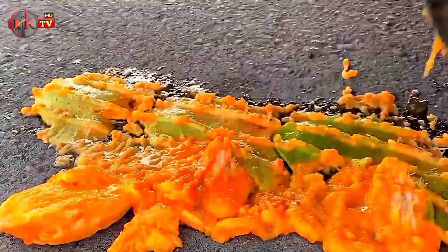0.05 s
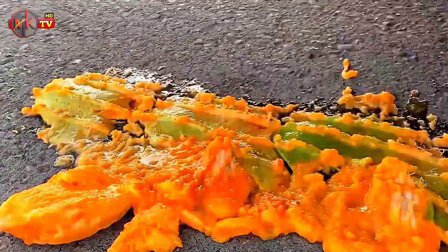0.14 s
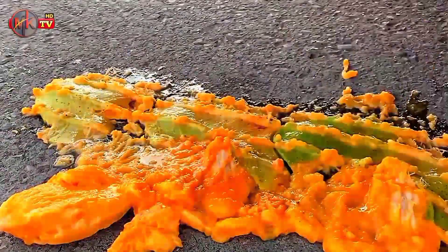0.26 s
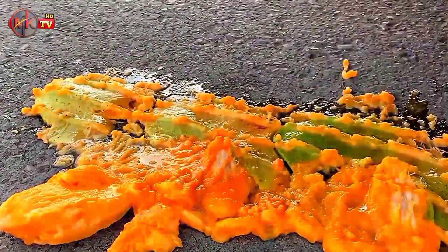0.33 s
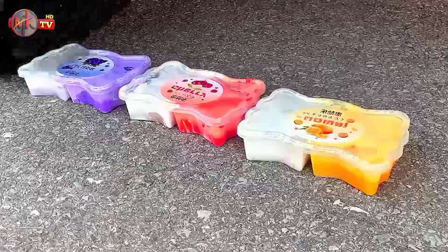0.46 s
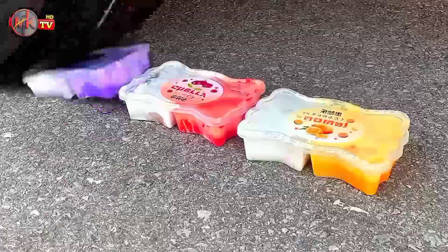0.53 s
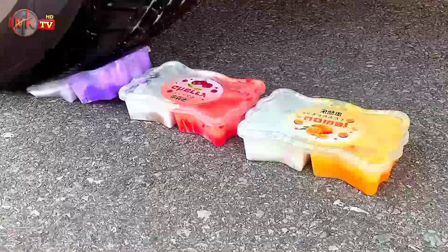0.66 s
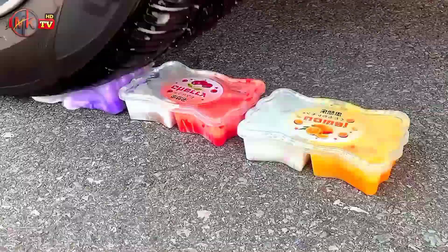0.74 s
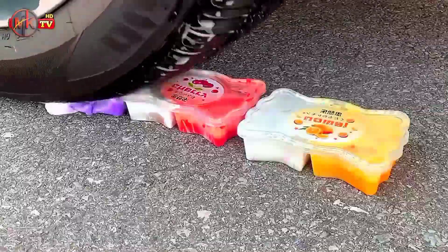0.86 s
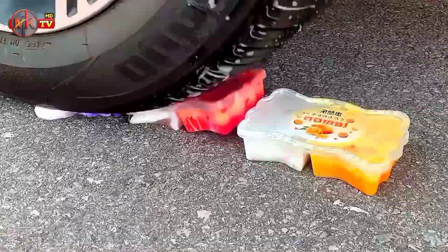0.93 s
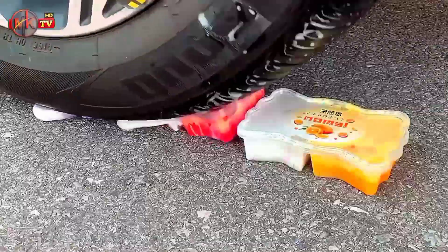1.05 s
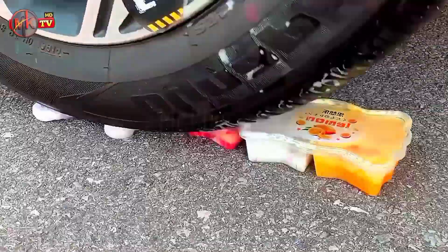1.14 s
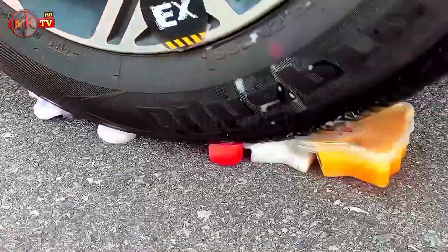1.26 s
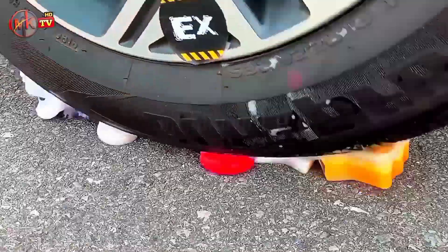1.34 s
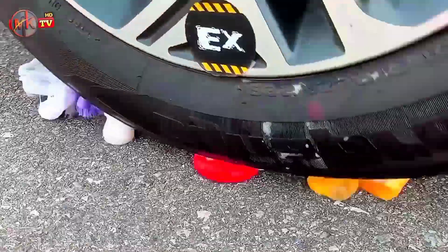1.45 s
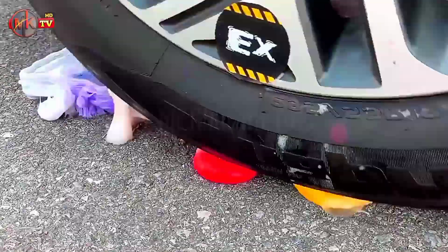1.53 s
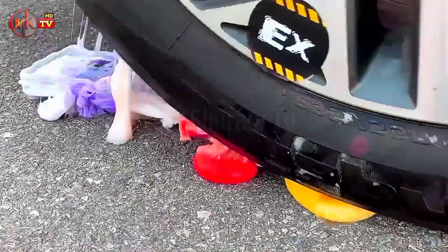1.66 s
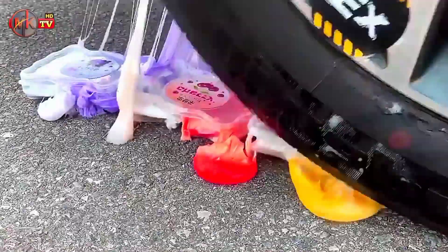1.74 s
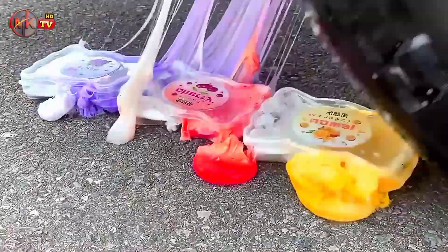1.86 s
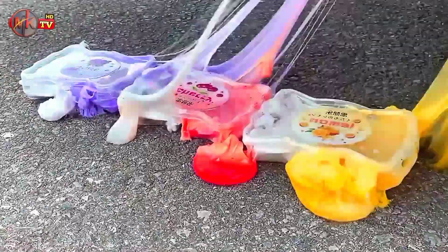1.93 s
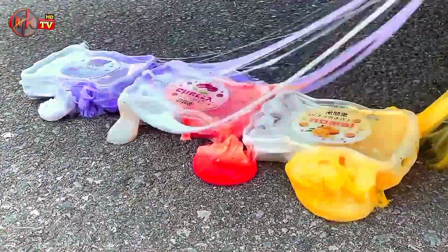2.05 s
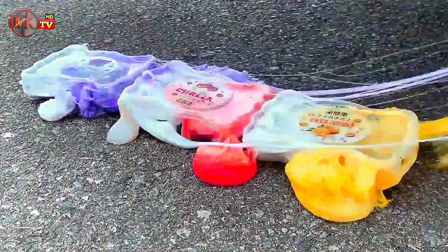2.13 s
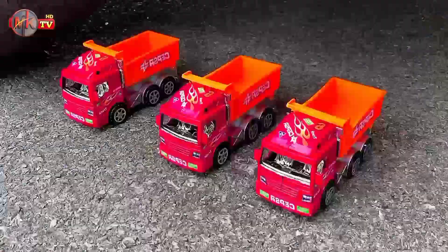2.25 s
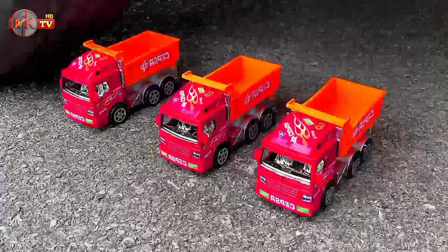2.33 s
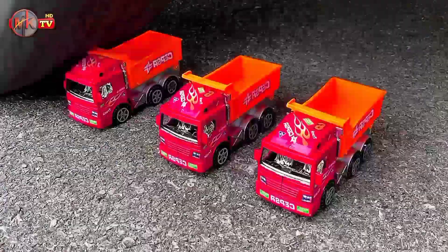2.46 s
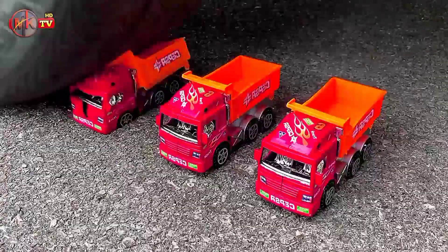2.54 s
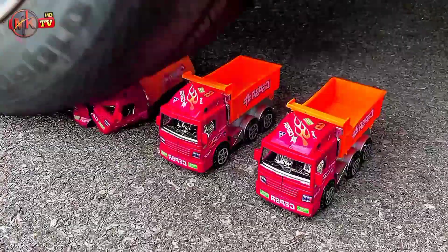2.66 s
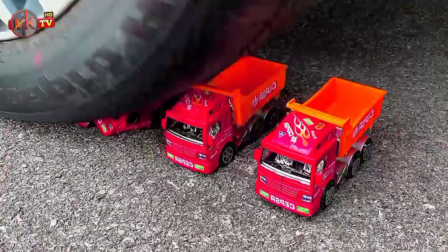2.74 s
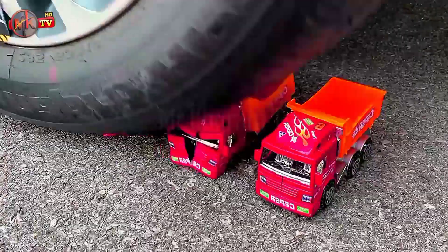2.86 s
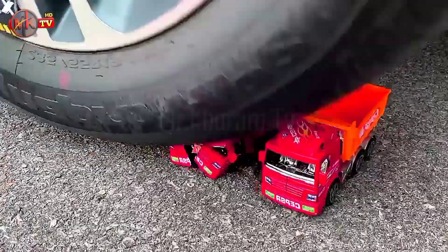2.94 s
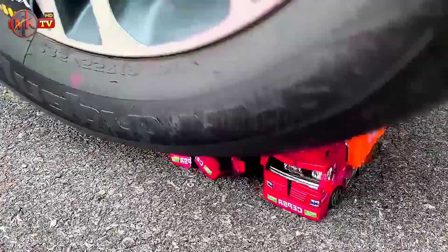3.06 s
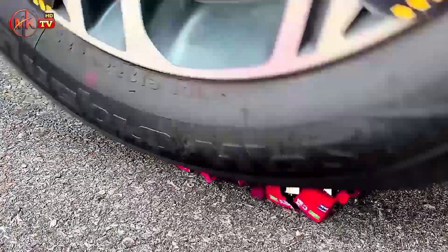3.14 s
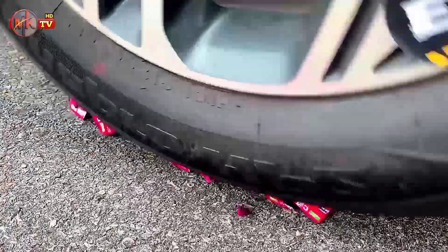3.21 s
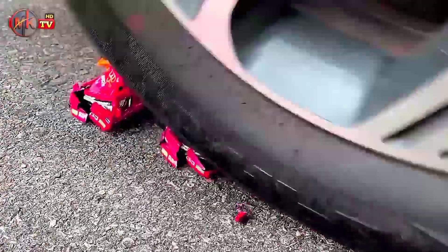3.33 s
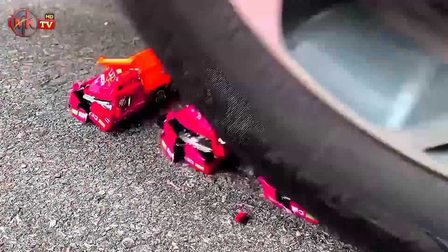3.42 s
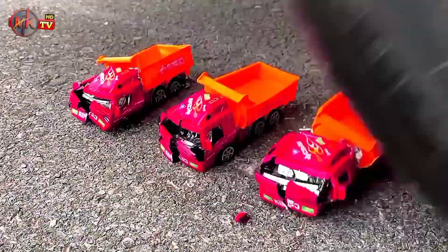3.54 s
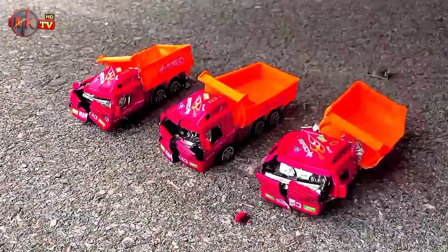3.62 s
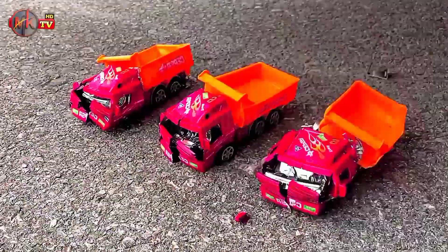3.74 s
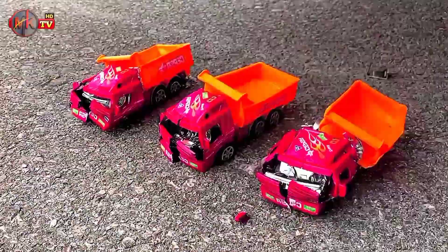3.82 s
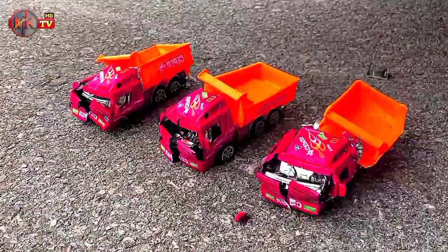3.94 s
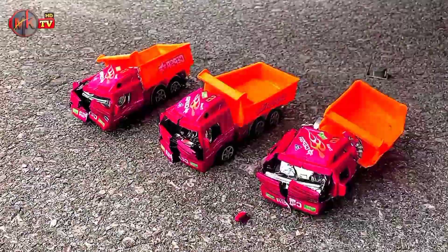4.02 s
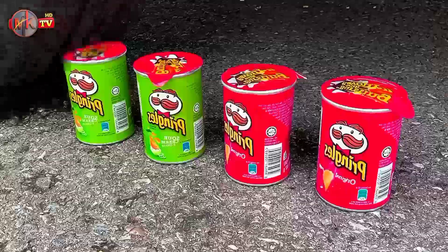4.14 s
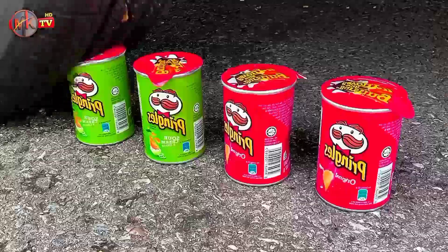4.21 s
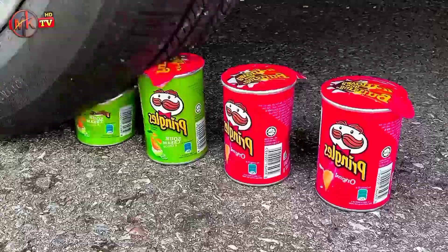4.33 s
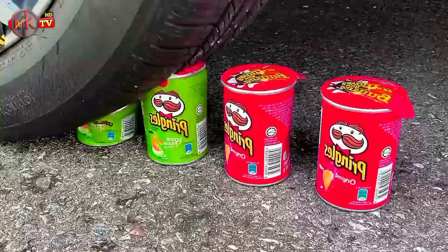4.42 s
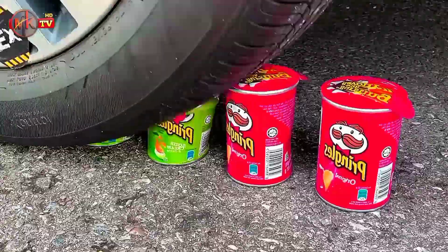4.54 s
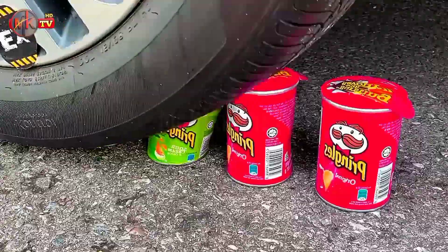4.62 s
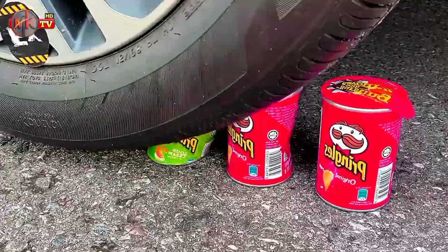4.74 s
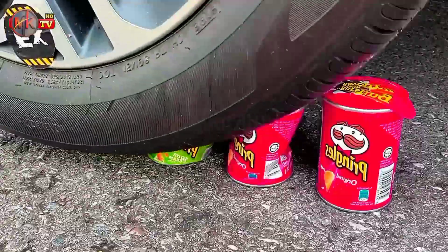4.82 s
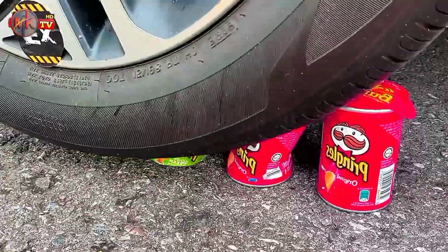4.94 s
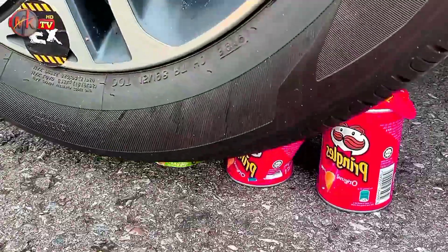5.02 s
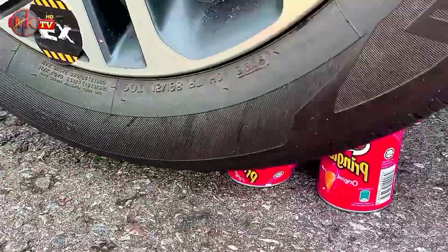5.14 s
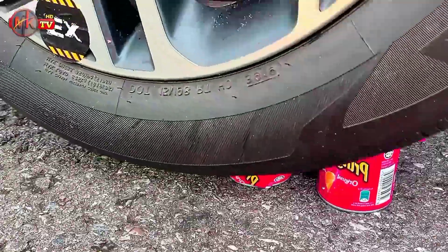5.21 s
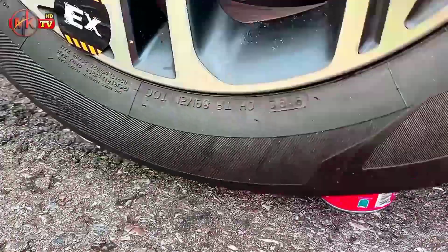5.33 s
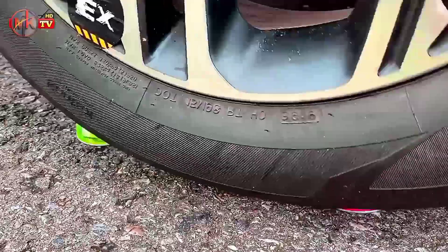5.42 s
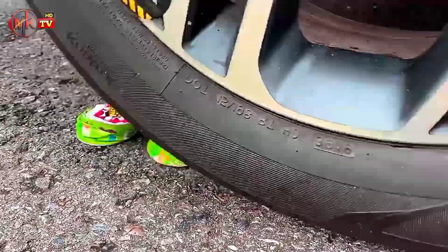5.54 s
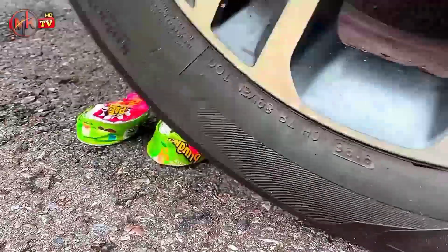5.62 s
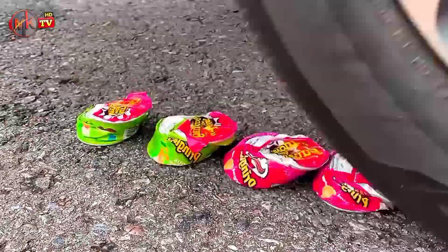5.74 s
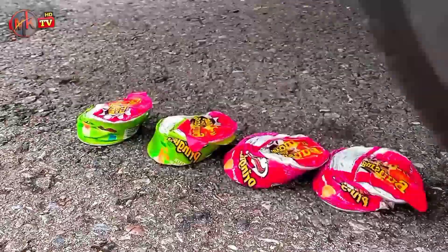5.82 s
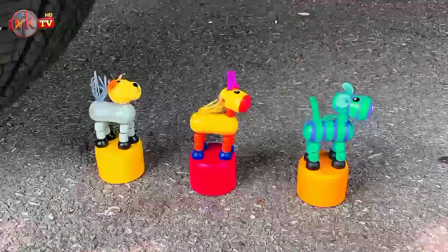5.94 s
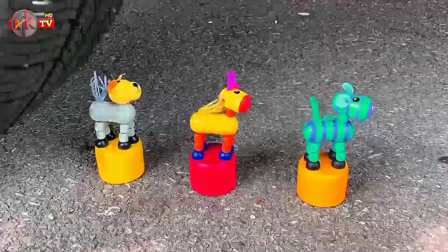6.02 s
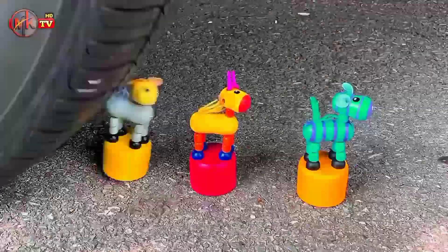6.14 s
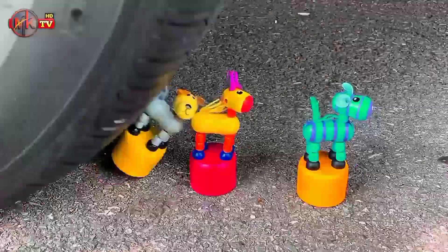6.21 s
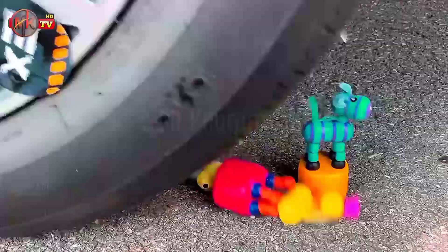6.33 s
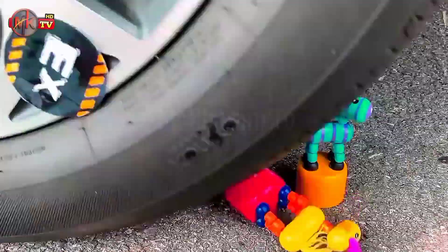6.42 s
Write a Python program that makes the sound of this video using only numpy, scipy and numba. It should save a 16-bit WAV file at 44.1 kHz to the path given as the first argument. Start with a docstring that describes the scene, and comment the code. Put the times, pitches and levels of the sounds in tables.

```python
"""On asphalt, right beside the wheel: a car tyre creeps over things laid on the ground.
Thin slime tubs pop, hard toy trucks snap, and cans of crisps buckle and grind to crumbs; at the end
the tyre nudges a row of toy figures. Fractures are click clusters that ring a shell, crumbling is dense
grains of noise, small pops are decaying sines. Sagging sine thuds mark things giving way, and coloured
noise makes the low rumble and faint hiss of the car."""
import sys
import numpy as np
from scipy import signal
from scipy.fft import rfft, irfft
from scipy.io import wavfile
from numba import njit

SR = 44100
rng = np.random.default_rng(int(sys.argv[2]) if len(sys.argv) > 2 else 0)


def output_pcm(signal):
    """Save a mono or channel-first signal as 16-bit PCM at the path in sys.argv[1].

    Samples are clipped to [-1, 1] before scaling.
    """
    pcm = np.clip(np.atleast_2d(signal).T, -1, 1) * 32767
    wavfile.write(sys.argv[1], SR, np.round(pcm).astype(np.int16))


N = 285327
TIME, FREQ = np.arange(N) / SR, np.fft.rfftfreq(N, 1 / SR)

# Crack and squeeze levels are starting points: each source's trims, the ports and record() act on them later.
# Tubs bursting: hollow body, sharp snap, shell resonance [start_s, body_db, snap_db, pitch_hz, decay_s]
TUB_CRACKS = [(0.6975, -18.5, -28.5, 560, 0.00072), (0.7262, -35, -29.5, 1650.0, 0.00045),
              (0.7825, -45, -31.5, 900, 0.0005), (0.8631, -16, -20, 1736, 0.023),
              (0.9045, -19.5, -20.5, 1910, 0.01), (0.9574, -13, -17, 801, 0.0023),
              (0.961, -14.5, -23, 1830, 0.0068), (1.0472, -24, -26.5, 1153, 0.0058),
              (1.0579, -18, -23, 563, 0.0013), (1.1358, -24, -25, 2790, 0.0088),
              (1.157, -37, -44, 2750, 0.045), (1.2045, -17, -29, 940, 0.00059),
              (1.2127, -30.5, -18, 591, 0.028), (1.2401, -20, -17.5, 1390, 0.0061),
              (1.298, -18.5, -24.5, 1026, 0.0026), (1.3254, -15.5, -20.5, 898, 0.0038),
              (1.3733, -10, -28, 594, 0.0057), (1.4239, -19.5, -26.5, 1100, 0.0043),
              (1.513, -9, -31, 1540, 0.00096), (1.5305, -14, -24, 935, 0.00074),
              (1.5638, -29, -9, 1082, 0.011), (1.572, -10, -16.5, 1174, 0.0073),
              (1.597, -10, -13, 980, 0.016), (1.606, -10.5, -21, 852, 0.015),
              (1.672, -20, -24.5, 1306, 0.0033), (1.6874, -20.5, -35.5, 1220, 0.00097),
              (1.7078, -21.5, -21.5, 1500, 0.0021), (1.7301, -18, -30.5, 465, 0.0073),
              (1.9231, -16, -33, 873, 0.00097), (1.9357, -23.5, -30.5, 1870, 0.0018),
              (1.9529, -23.5, -35, 1090, 0.012), (1.9934, -30, -46, 871, 0.0021),
              (2.009, -32.5, -45.5, 710, 0.0036)]
# The tyre bears down on three tubs [start_s, end_s, body_db, treble_db]
TUB_SQUEEZES = [(.87, 1.18, -49.5, -45), (1.21, 1.55, -37.5, -40.5), (1.6, 2.005, -31, -48)]
# Colour of the thin tubs, relative power density [freq_hz, density_db]
TUB_COLOUR = [(120, 1.5), (300, 4), (900, 0), (1500, -4), (2300, -8.5), (4300, -12), (6200, -8.5),
              (8400, -15.5), (10800, -21.5)]


def tubs():
    """Thin shells burst in clicks and shed splinters, while air pockets burst in the slime."""
    bursts = cracks(TUB_CRACKS, TUB_COLOUR, ring_q=2.0, ring_db=11.0, tail_db=-31.5, tail_s=0.0083)
    pressing = squeeze(TUB_SQUEEZES, attack_s=0.013, release_s=.01,
                       body_sag_db_per_s=29.5, treble_sag_db_per_s=30.5)
    shedding = debris(TUB_CRACKS, settle_s=0.021, body_db=-17.5, snap_db=-14.0)
    effort = np.hypot(pressing, shedding)
    splinters = crumble(effort, TUB_COLOUR, rate=2200, surge_db=6, body_db=0, snap_db=-1)
    air_pockets = pops(effort, count=4000, low_hz=380, high_hz=1400, cycles=3.4, db=-5.5)
    return bursts + splinters + air_pockets + squelch()


# Slime squelches out from under the tyre [start_s, end_s, body_db, treble_db]
SQUELCHES = [(1.66, 2.005, -36, -37)]
# Colour of the slime, relative power density [freq_hz, density_db]
SLIME_COLOUR = [(150, -0.5), (1000, 5), (2000, -9.5), (6500, -8.5), (8400, -26)]


def squelch():
    """Wet slime is forced out as a dense run of tiny soft grains that ease off."""
    effort = squeeze(SQUELCHES, attack_s=0.015, release_s=0.0051,
                     body_sag_db_per_s=15, treble_sag_db_per_s=22)
    return crumble(effort, SLIME_COLOUR, rate=4400, surge_db=1.5, body_db=-2.5, snap_db=-7.5)


# Toys snapping, and at the end two faint knocks of nudged toy figures: hollow body, sharp snap,
# shell resonance [start_s, body_db, snap_db, pitch_hz]
TOY_CRACKS = [(2.6975, -25.5, -16.5, 2600), (2.7183, -19.5, -23.5, 1920), (2.7372, -22, -17, 1280),
              (2.7635, -16, -23, 2120), (2.779, -18.5, -24, 1090), (2.795, -12.5, -17.5, 780),
              (2.8248, -26, -22, 1320), (2.834, -26.5, -31, 2430), (2.8775, -25, -31.5, 2460),
              (2.9385, -22.5, -21, 2130), (2.9578, -24, -22.5, 2530), (2.999, -27.5, -27, 1210),
              (3.0085, -19, -21.5, 1210), (3.045, -21.5, -22, 2400), (3.0765, -21, -16.5, 1900),
              (3.1226, -24.5, -26.5, 1280), (3.157, -24.5, -22.5, 2300), (3.1685, -27, -21, 2400),
              (3.18, -24, -21, 1160), (3.2205, -18.5, -23.5, 313), (3.262, -22, -19.5, 294),
              (3.3265, -18.5, -22, 295), (3.3455, -14.5, -16.5, 900), (3.3586, -27.5, -21, 2430),
              (3.4035, -33, -29, 2450), (3.4158, -15.5, -14, 3100), (3.4355, -21, -15.5, 2820),
              (3.4921, -24.5, -18.5, 350), (3.525, -56.5, -37, 2400), (3.633, -36, -30, 1370),
              (3.662, -36.5, -47, 1400), (6.3472, -37, -55, 1230), (6.4166, -42.5, -51, 1880)]
# The tyre bears down on three trucks, then the wrecks ease back [start_s, end_s, body_db, treble_db]
TOY_SQUEEZES = [(2.715, 2.88, -39, -36), (3.03, 3.10, -32.5, -35), (3.245, 3.28, -29.5, -33),
                (3.5, 3.67, -48, -58)]
# Colour of the hard toys, relative power density [freq_hz, density_db]
TOY_COLOUR = [(120, 5), (300, 2), (1400, 1), (2200, -3.5), (5200, -3), (6500, -3.5), (8400, -11),
              (10800, -16)]


def toys():
    """Hard plastic snaps with a ringing shell, shards grind and pop; nudged figures knock faintly at the end."""
    snaps = cracks(TOY_CRACKS, TOY_COLOUR, ring_q=6.2, ring_db=11.5,
                   tail_db=-14.5, tail_s=0.0048, decay_s=0.0046)
    pressing = squeeze(TOY_SQUEEZES, attack_s=0.016, release_s=0.023,
                       body_sag_db_per_s=13, treble_sag_db_per_s=7)
    shedding = debris(TOY_CRACKS, settle_s=0.021, body_db=-10.5, snap_db=-19.5)
    effort = np.hypot(pressing, shedding)
    shards = crumble(effort, TOY_COLOUR, rate=1200, surge_db=2.5, body_db=-4, snap_db=2)
    plastic = pops(effort, count=1300, low_hz=845, high_hz=4540, cycles=11, db=-6.0)
    return snaps + shards + plastic


# Cans buckling and springing back: hollow body, sharp snap, shell resonance
# [start_s, body_db, snap_db, pitch_hz]
CAN_CRACKS = [(4.205, -39.5, -73, 870), (4.2318, -41, -68.5, 920), (4.3181, -29, -53, 2260),
              (4.3501, -22, -46.5, 2230), (4.3642, -22.5, -41, 2530), (4.444, -28, -44, 1830),
              (4.473, -35, -27.5, 940), (4.5427, -19.5, -29, 1270), (4.5622, -23, -35, 1360),
              (4.612, -26, -56, 864), (4.653, -24, -46, 1340), (4.7273, -23, -25.5, 490),
              (4.795, -50, -53, 950), (4.941, -34.5, -53, 870), (4.9665, -20.5, -41, 950),
              (5.327, -34.5, -57, 950), (5.4281, -24, -43, 1289), (5.518, -32, -34, 1610),
              (5.7701, -25.5, -26, 2670), (5.888, -41, -62.5, 1670)]
# Surges as the tyre dents and flattens four cans [start_s, end_s, body_db, treble_db]
CAN_SQUEEZES = [(4.455, 4.57, -28, -36), (4.655, 4.74, -33.5, -38), (4.95, 5.02, -33.5, -37),
                (5.11, 5.25, -35, -38.5), (5.3, 5.52, -30.5, -35.5)]
# Colour of the cans and crisps, relative power density [freq_hz, density_db]
CAN_COLOUR = [(120, 0), (320, -4.5), (1050, -4.5), (2200, -4.5), (2950, -1.5), (5300, 5.5), (6100, 3.5),
              (6800, 5), (8400, -7.5), (10400, -3), (11500, -50.5)]


def cans():
    """Can walls buckle and crease, crisps grind to crumbs inside them, and the metal ends ring."""
    buckles = undb(-2.0) * cracks(CAN_CRACKS, CAN_COLOUR, ring_q=13.3, ring_db=9.0,
                                  tail_db=5.5, tail_s=0.0087, decay_s=0.0042)
    effort = squeeze(CAN_SQUEEZES, attack_s=0.033, release_s=0.23, body_sag_db_per_s=26)
    effort = effort * held(0, RIDES[-1][1], 1, 0.0082)  # the tyre drops off the last can
    crunch = crumble(effort, CAN_COLOUR, rate=3800, surge_db=1, body_db=-2.0, snap_db=-0.5)
    crisps = walls(crunch, q=6.8, drift=0.041, swell_db=9.5, db=-13.0)
    creases = pops(effort, count=600, low_hz=298, high_hz=2400, cycles=3.2, db=-5)
    # single crisps snapping follow the treble effort
    flakes = pops(effort[::-1], count=1200, low_hz=1450, high_hz=7820, cycles=48, db=-6.5)
    return buckles + crisps + creases + flakes + rims(q=6.7, hz=2906, fade_s=0.028)


# Resonances of the can walls [pitch_hz]
WALL_MODES_HZ = (350, 920, 1340, 1700, 4100)


def walls(crunch, q, drift, swell_db, db):
    """The can walls ring with the crunch; each resonance shifts in pitch and comes and goes as they fold."""
    out = crunch
    for hz in WALL_MODES_HZ:
        centre = hz * np.exp(drift * walk(9))
        gain = undb(db + swell_db * walk(16))
        out = out + gain * np.array([resonate(side, centre, float(q)) for side in crunch])
    return out


# The metal can ends ring brightly as they fold [start_s, end_s, level_db]
RIM_RINGS = [(4.69, 4.74, -28.5), (4.825, 4.835, -35.5), (5.117, 5.287, -40)]


def rims(q, hz, fade_s):
    """Short rasps excite the metal can ends, whose pitch wavers as they bend."""
    effort = sum(undb(db) * held(start, end, fade_s, fade_s) for start, end, db in RIM_RINGS)
    rasp = rng.standard_normal((2, N)) * undb(5 * walk(130))
    centre = hz * np.exp(.035 * walk(45))
    once = [resonate(side, centre, float(q)) for side in rasp]
    ring = np.array([resonate(side, centre, float(q)) for side in once])
    return ring / np.std(ring) * effort


# Dull knocks as something gives way under the tyre; level and pitch before they fade and sag
# [start_s, level_db, pitch_hz]
THUDS = [(0.906, -12.5, 135), (0.963, -14, 143), (1.578, -5, 101), (1.605, -5, 175), (2.791, -18, 293),
         (3.253, -0.5, 105), (3.327, -12.5, 176), (3.435, -3, 325), (4.317, -18.5, 340), (5.372, -19, 315),
         (5.768, -16, 255.2), (5.963, -23.5, 274)]
THUD_CYCLES = 0.88  # swings in which a knock fades to 1 / e


def thuds(sag=0.13, wobble_db=-17, wobble_s=0.042):
    """The rubber lands and swings briefly, its pitch sagging as the load settles; a faint wobble lingers."""
    out, t = np.zeros((2, N)), np.arange(SR // 4) / SR
    for s, db, hz in THUDS:
        decay = THUD_CYCLES / hz
        sagging_hz = hz * (1 - sag * (1 - np.exp(-t / decay / 2)))
        swing = np.sin(2 * np.pi * np.cumsum(sagging_hz) / SR)
        wobble = undb(wobble_db) * np.exp(-t / wobble_s * hz / 100)  # wobble_s holds at 100 Hz
        fade = np.maximum(np.exp(-t / decay), wobble)
        onset = 1 - np.exp(-t / 0.00059)
        add(out, s, undb(db) * (swing * fade * onset)[None])
    return out


# Stretches of car sound, each with its own starting rumble and hiss level, before the trims
# [start_s, rumble_db, hiss_db]
CAR_STRETCHES = [(0, -41.5, -47.5), (.52, -42.5, -49), (2.321, -49.5, -55), (3.45, -48.5, -52),
                 (5.801, -40, -52.5), (6.021, -44, -44.5)]
# The tyre rides on top of the things [start_s, end_s]
RIDES = [(.9, 1.8), (3.17, 3.45), (4.369, 5.78)]
# Colours of rumble and hiss, relative power density [freq_hz, density_db]
RUMBLE_COLOUR = [(12, -6), (28, -1.5), (72, 2.5), (100, -2.5), (145, -6), (320, -28), (700, -88.5)]
HISS_COLOUR = [(100, 7.5), (440, 3), (600, -6), (2900, -12), (4000, -23), (6500, -23), (9000, -37.5)]
RUMBLE_RISE_DB_PER_S, HISS_RISE_DB_PER_S = 5, 0.5  # growth within each stretch
LOAD_DB, LOAD_EASE_S = -36, 0.027  # extra rumble during a ride, before the rumble trim


def car(rumble_db=2, hiss_db=0):
    """Low rumble under a faint, wavering hiss; both grow within a stretch, and rumble swells under load."""
    stretches = np.array(CAR_STRETCHES)
    start, idle_db, air_db = stretches[np.searchsorted(stretches[1:, 0], TIME)].T
    since = TIME - start
    load = sum(held(on, off, LOAD_EASE_S, LOAD_EASE_S) for on, off in RIDES)
    drive = np.hypot(undb(idle_db + RUMBLE_RISE_DB_PER_S * since), undb(LOAD_DB) * load)
    rumble = colour(rng.standard_normal((2, N)), undb(over_hz(RUMBLE_COLOUR))) * drive
    air = undb(air_db + HISS_RISE_DB_PER_S * since + 0.24 * walk(17))
    hiss = colour(rng.standard_normal((2, N)), undb(over_hz(HISS_COLOUR))) * air
    return undb(rumble_db) * rumble + undb(hiss_db) * hiss


def cracks(table, spectrum, ring_q, ring_db, tail_db, tail_s, decay_s=None):
    """A fracture runs in uneven clicks, rings the shell briefly and stirs a few high shard modes."""
    out, size = np.zeros((2, N)), 4096
    t = np.arange(size) / SR - .004  # a 4 ms lead-in leaves room for the rise
    f = np.fft.rfftfreq(size, 1 / SR) + 1
    gain = np.interp(f, FREQ, undb(over_hz(spectrum)))
    ratio = (f / 2200) ** 4  # body below 2200 Hz, snap above
    for s, body_db, snap_db, hz, *own_decay in table:
        decay = own_decay[0] if own_decay else decay_s
        # a long tear also starts more slowly than a clean snap
        after, rise = np.maximum(t, 0), np.clip(decay / 3, .0007, .0014)
        fade = np.exp(-after / abs(decay)) + undb(tail_db) * np.exp(-after / tail_s)
        shape = np.exp(np.minimum(t, 0) / rise) * fade
        jerks = np.exp(.45 * np.repeat(rng.standard_normal(size // 32), 32))
        clicks = rfft(rng.standard_normal((2, size)) * shape * jerks)
        ring = 1 + undb(ring_db) / (1 + 1j * ring_q * (f / hz - hz / f))
        # every shard also has a few high modes of its own
        modes = rng.uniform(1800, 10500, size=6)
        shard = 1 + sum(3 / (1 + 16j * (f / mode - mode / f)) for mode in modes)
        body = irfft(clicks * gain * ring / np.hypot(1, ratio))
        snap = irfft(clicks * gain * shard * ratio / np.hypot(1, ratio))
        add(out, s + t[0], burst(body, body_db) + burst(snap, snap_db))
    return out


def crumble(effort, spectrum, rate, surge_db, body_db, snap_db):
    """Many tiny fractures of very unequal size, rate per second on average, coming in surges."""
    sizes = (rng.random(N) < rate / SR) * undb(3.6 * np.minimum(rng.exponential(size=N), 4))
    # the power of each fracture dies away in 0.6 ms
    power = signal.lfilter([1], [1, -np.exp(-1 / (.0006 * SR))], sizes ** 2)
    surges = undb(surge_db * walk(70))
    grains = np.sqrt(power / power.mean()) * surges * rng.standard_normal((2, N))
    body = grains * effort[0] * undb(body_db)
    snap = grains * effort[1] * undb(snap_db)
    return shell(body, snap, spectrum)


def pops(effort, count, low_hz, high_hz, cycles, db):
    """Small pitched pops at random moments, as loud as the crush is hard; each rings for a few cycles."""
    out, t = np.zeros((2, N)), np.arange(1024) / SR
    for when, pitch, size, place in rng.random((count, 4)):
        hz = low_hz * (high_hz / low_hz) ** pitch
        ring = np.sin(2 * np.pi * hz * t) * np.exp(-hz * t / cycles) * np.sqrt(hz) * size ** 2
        bearing = 2 * np.pi * place
        add(out, when * N / SR, np.outer([np.cos(bearing), np.sin(bearing)], ring))
    return out / np.std(out) * effort[0] * undb(db)


def squeeze(table, attack_s, release_s, body_sag_db_per_s, treble_sag_db_per_s=0):
    """Body and treble gain of a crush: strongest as the object gives; each band eases by its sag."""
    gain = np.zeros((2, N))
    for start, end, body_db, treble_db in table:
        since = np.clip(TIME - start, 0, end - start)
        db = [body_db - body_sag_db_per_s * since, treble_db - treble_sag_db_per_s * since]
        gain = np.maximum(gain, undb(db) * held(start, end, attack_s, release_s))
    return gain


def debris(table, settle_s, body_db, snap_db, linger_s=0.096, linger_db=-16):
    """Body and treble gain of the splinters each crack sheds: most settle at once, a few trickle on."""
    kicks = np.zeros((2, N))
    for s, crack_body_db, crack_snap_db, *_ in table:
        kicks[:, int(s * SR)] += undb([crack_body_db + body_db, crack_snap_db + snap_db]) ** 2

    def fade(seconds):
        """Power that leaks away; its square root falls to 1 / e in this time."""
        return signal.lfilter([1], [1, -np.exp(-2 / (seconds * SR))], kicks + 1e-18)

    return np.sqrt(fade(settle_s) + undb(linger_db) ** 2 * fade(linger_s))


def held(start, end, attack_s, release_s):
    """Gain that rises to one at the start, holds, and dies away after the end."""
    before = np.minimum(TIME - start, 0) / attack_s
    after = np.maximum(TIME - end, 0) / release_s
    return np.exp(np.maximum(before - after, -20))


@njit
def resonate(x, hz, q):
    """Band-pass whose centre moves with every sample."""
    y, band, low = np.empty(len(x)), 0., 0.
    for i in range(len(x)):
        g = np.tan(np.pi * hz[i] / SR)
        v = (band + g * (x[i] - low)) / (1 + g * (g + 1 / q))
        band, low, y[i] = 2 * v - band, low + 2 * g * v, v / q
    return y


def shell(body, snap, spectrum):
    """Give the low body and the bright snap the colour of one material, parted at 2200 Hz."""
    gain, ratio = undb(over_hz(spectrum)), (FREQ / 2200) ** 4
    return colour(body, gain / np.hypot(1, ratio)) + colour(snap, gain * ratio / np.hypot(1, ratio))


def colour(x, gain):
    """Filter by a gain over frequency; white noise keeps its power."""
    return irfft(rfft(x) * gain / np.sqrt(np.mean(gain ** 2)), N)


def over_hz(table, axis=1):
    """One column of a table, joined on a log-frequency axis."""
    table = np.array(table)
    return np.interp(np.log(FREQ + 1), np.log(table[:, 0]), table[:, axis])


def walk(rate):
    """Smooth chance with a spread near 1, taking this many steps per second."""
    steps = rng.standard_normal(4096)
    return 1.2 * np.interp(TIME * rate, np.arange(len(steps)), steps)


def burst(x, db):
    """Scale a burst so that its energy equals 10 ms at this level."""
    return x * undb(db) * np.sqrt(SR / 100 / np.mean(np.sum(x ** 2, axis=1)))


def add(track, s, sound):
    """Lay a sound into a track at time s."""
    start = max(int(s * SR), 0)
    track[:, start:start + sound.shape[1]] += sound[:, :max(N - start, 0)]


def undb(db):
    """Decibels to an amplitude factor."""
    return 10 ** (np.asarray(db) / 20)


# The two microphone ports: likeness from 0 to 1, lag of left behind right
# [freq_hz, likeness, left_lag_ms]
PORTS = [(60, .96, 0), (400, .8, -.08), (900, .72, -.1), (2300, .3, -.16), (3200, .2, 0), (6200, .7, .145),
         (10000, .35, .2)]


def ports(pair):
    """Two unrelated signals become left and right: alike in the bass, with a small lag higher up."""
    alike = np.clip(over_hz(PORTS), 0, 1)
    mid, side = rfft(pair) * np.sqrt([(1 + alike) / 2, (1 - alike) / 2])
    # each side turns by half the lag
    turn = np.exp(-1j * np.pi * FREQ * over_hz(PORTS, axis=2) / 10 ** 3)
    return irfft(np.array([(mid + side) * turn, (mid - side) / turn]), N)


def scene():
    """Tubs, toys, cans and car heard through the two ports; the thuds reach both sides alike."""
    crushing = tubs() + toys() + cans()
    balance = undb([[-.4], [.4]])  # left, right
    return (ports(crushing + car()) + thuds()) * balance


TOP_HZ = 11150  # upper edge of the phone's sound


def record(dry):
    """The phone rounds the loudest peaks and cuts the top."""
    ceiling = .62
    rounded = ceiling * np.tanh(dry / ceiling)
    return signal.sosfilt(signal.cheby1(12, .3, TOP_HZ, fs=SR, output="sos"), rounded)


dry = scene()
out = record(dry)
output_pcm(out)
```